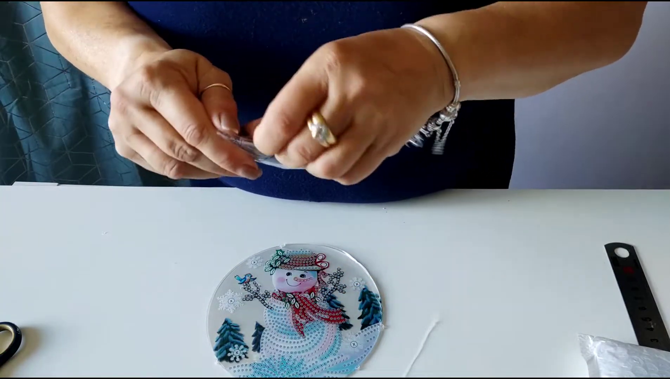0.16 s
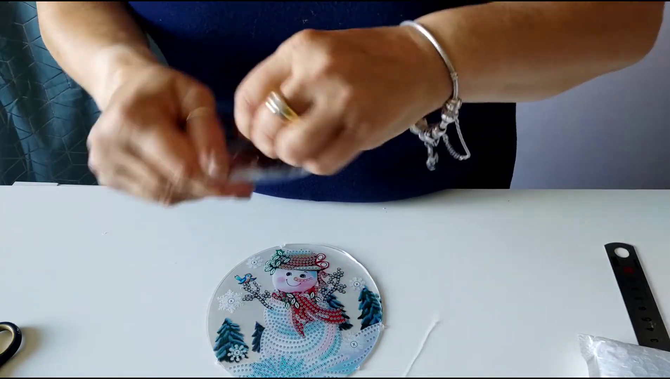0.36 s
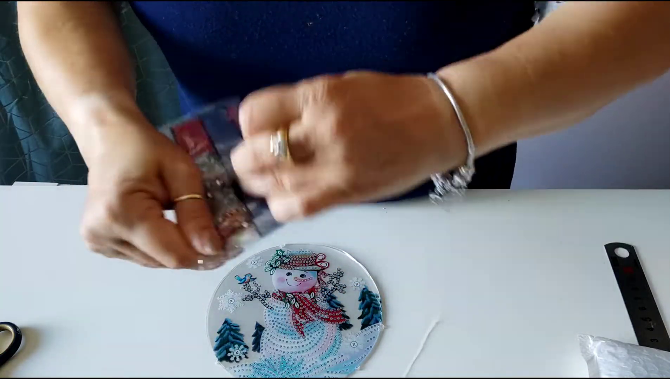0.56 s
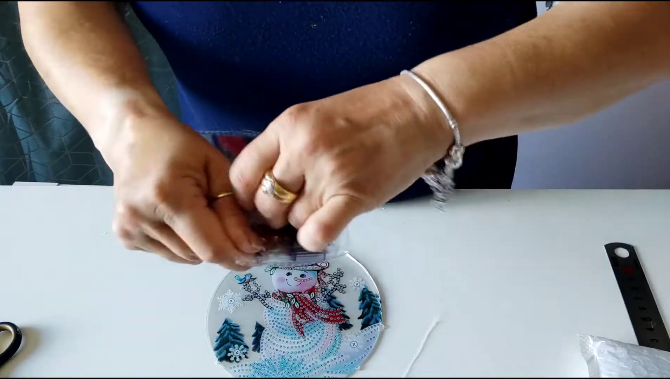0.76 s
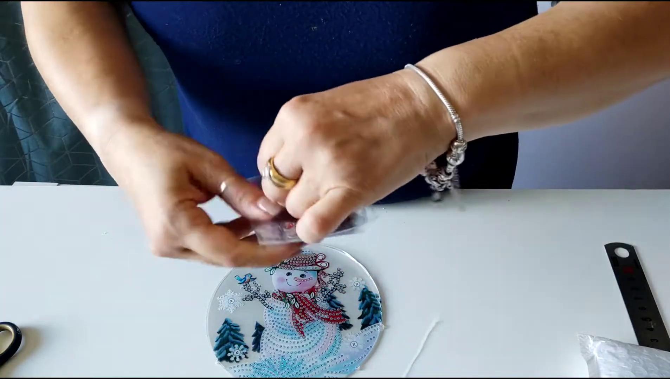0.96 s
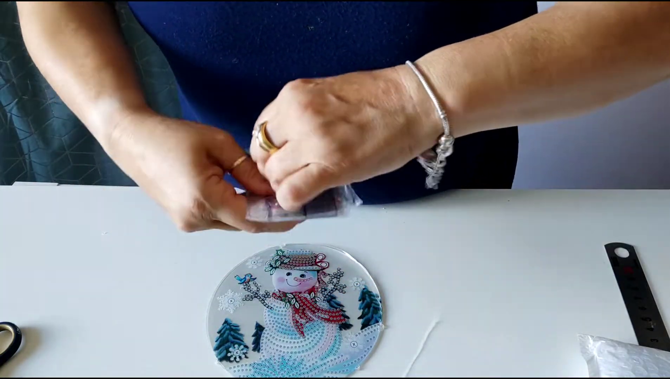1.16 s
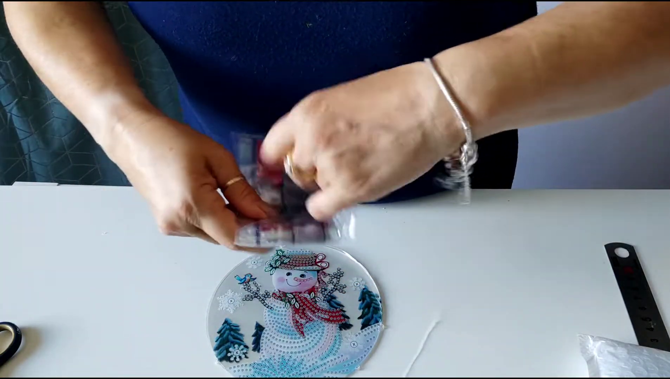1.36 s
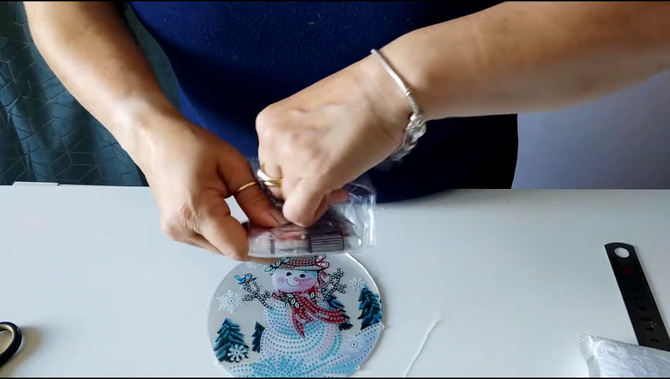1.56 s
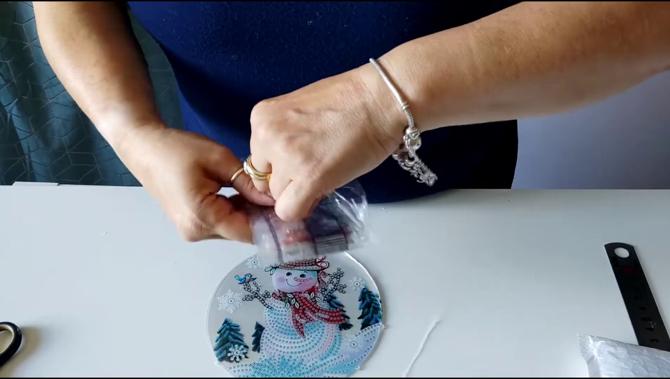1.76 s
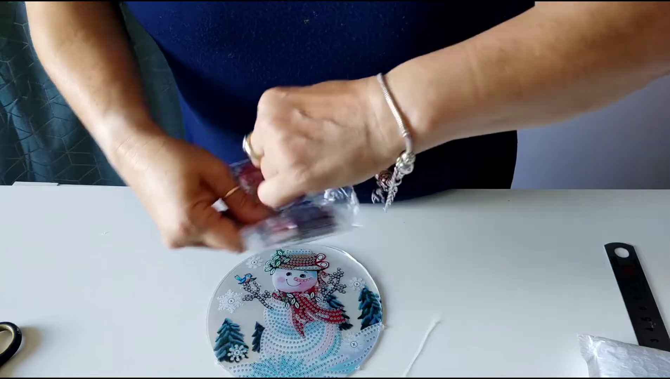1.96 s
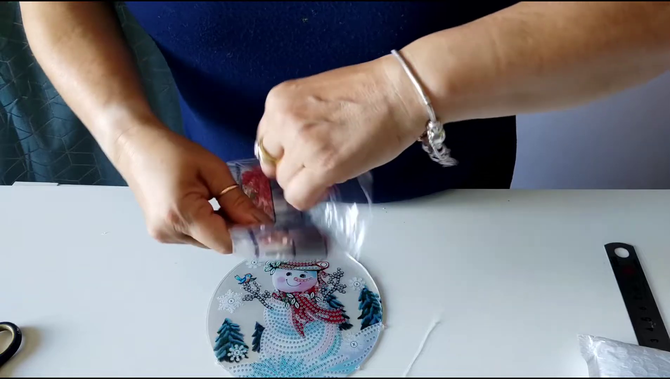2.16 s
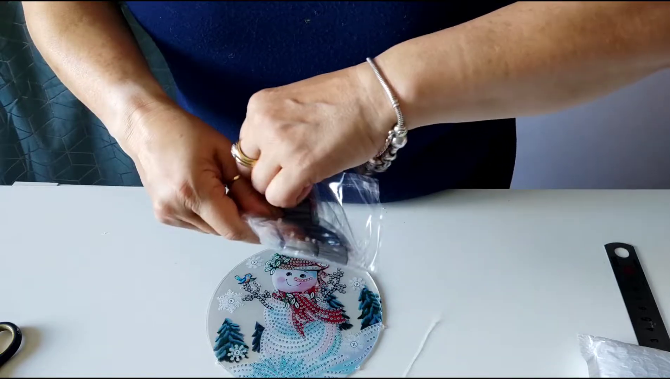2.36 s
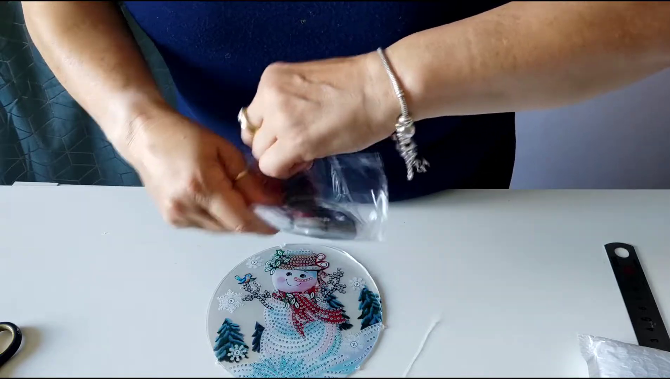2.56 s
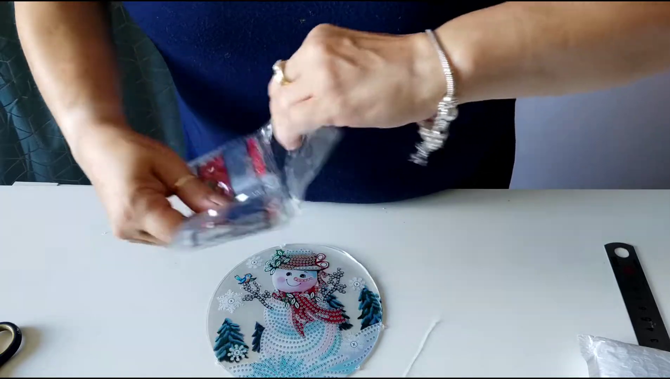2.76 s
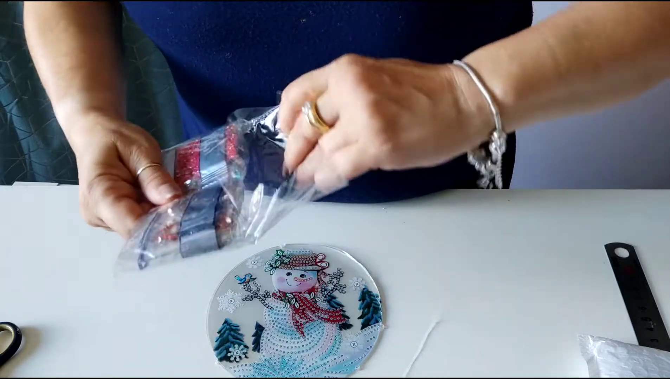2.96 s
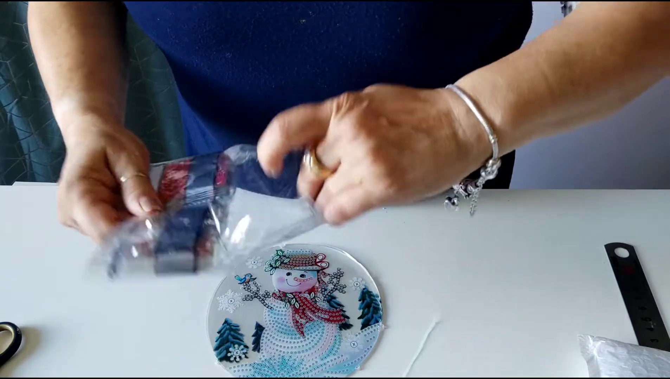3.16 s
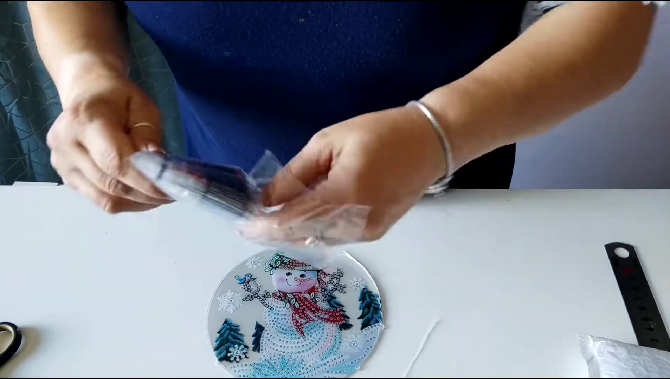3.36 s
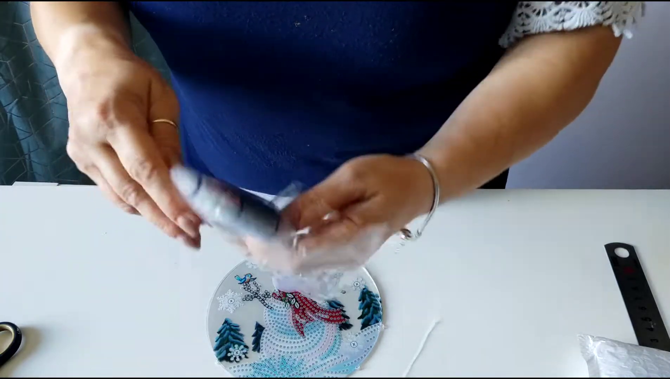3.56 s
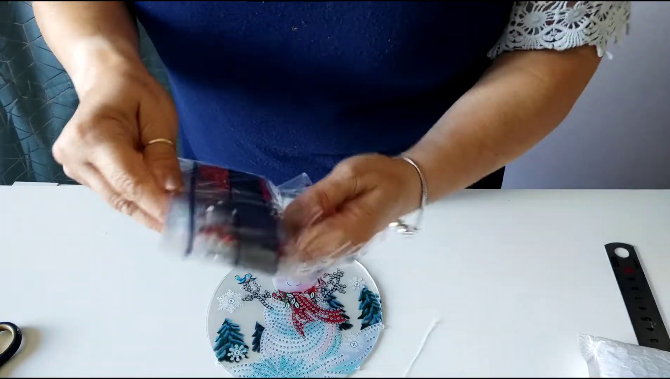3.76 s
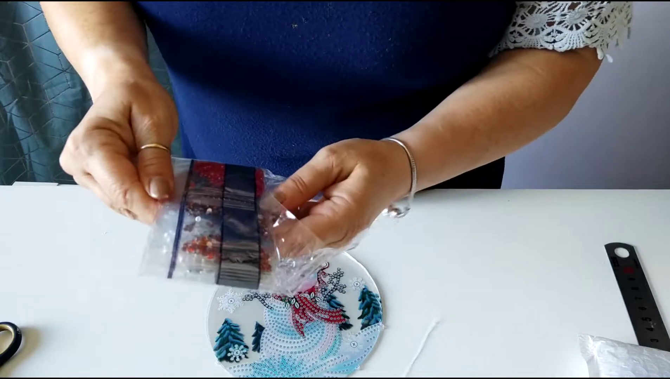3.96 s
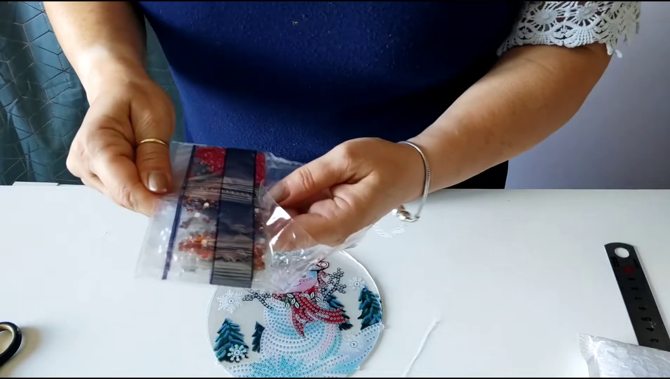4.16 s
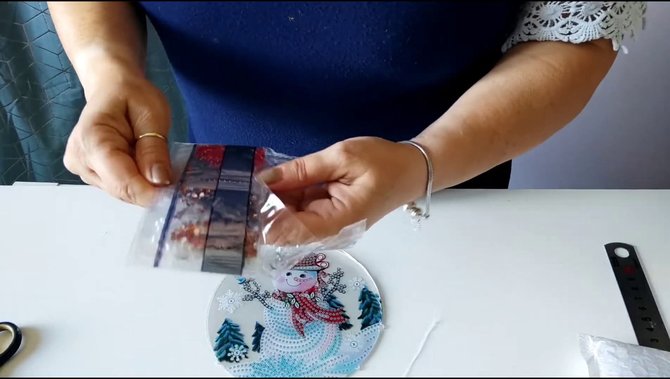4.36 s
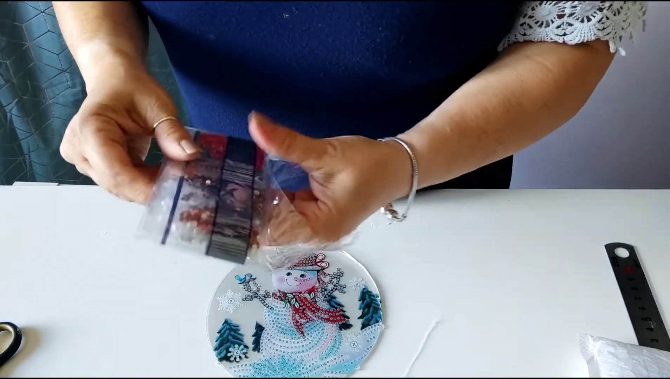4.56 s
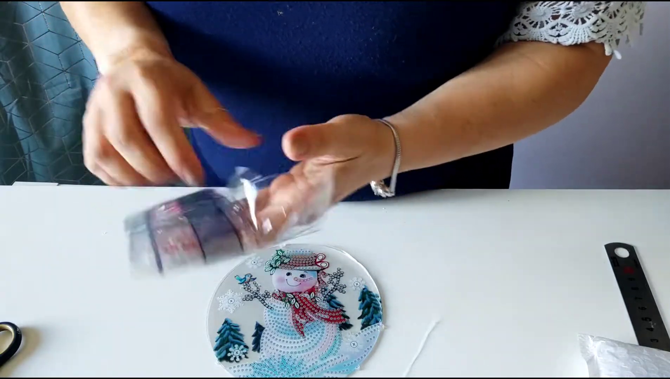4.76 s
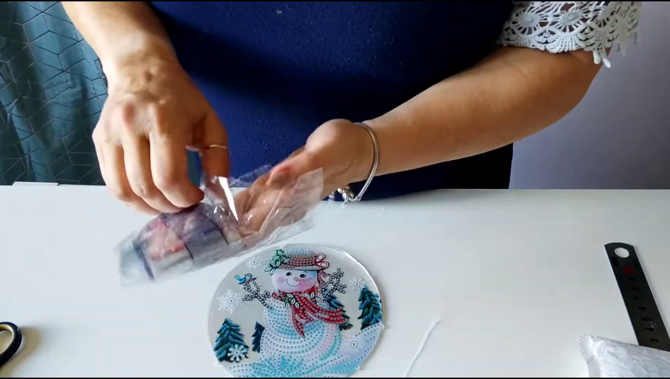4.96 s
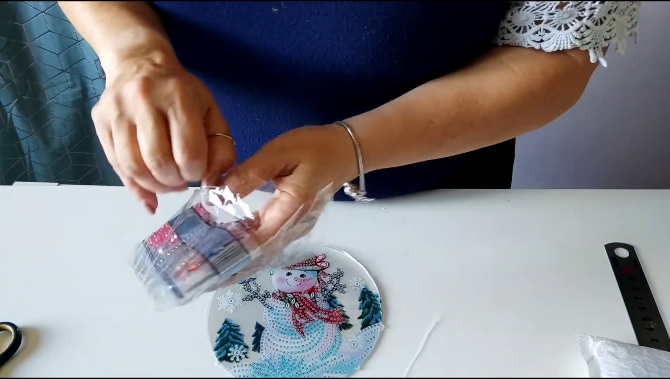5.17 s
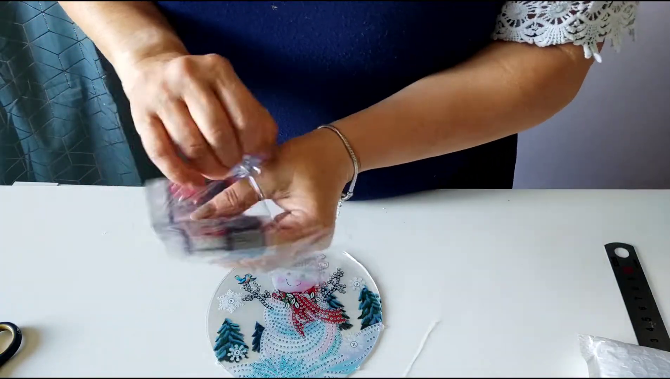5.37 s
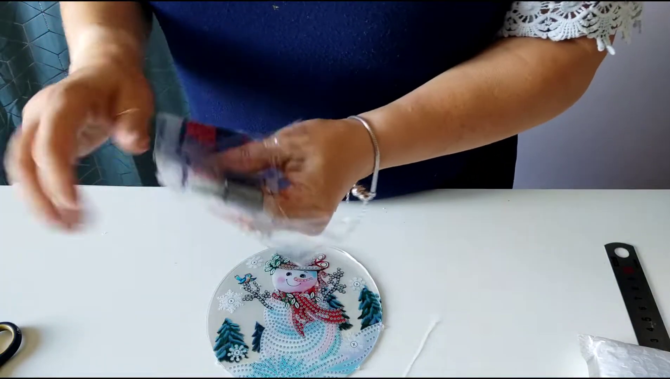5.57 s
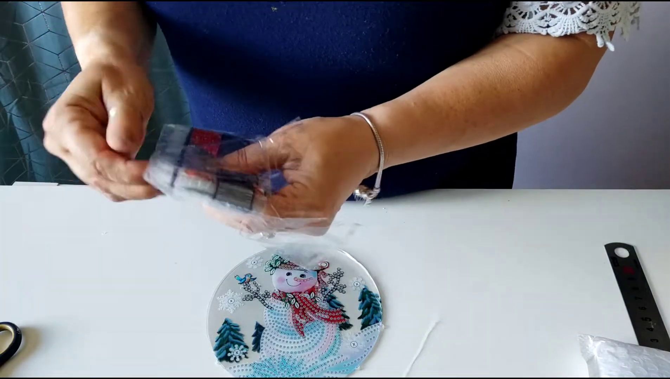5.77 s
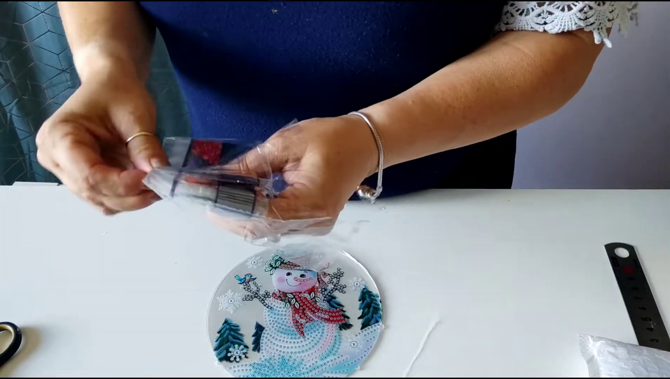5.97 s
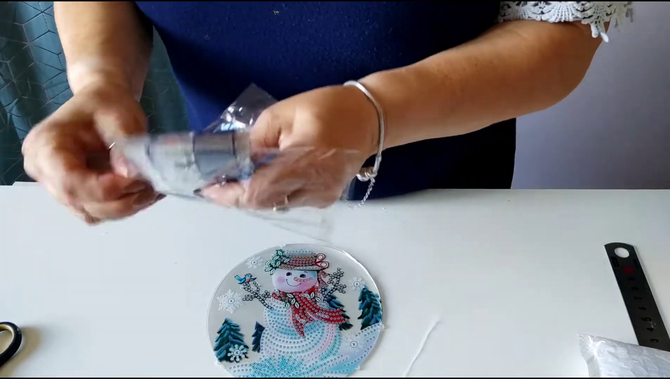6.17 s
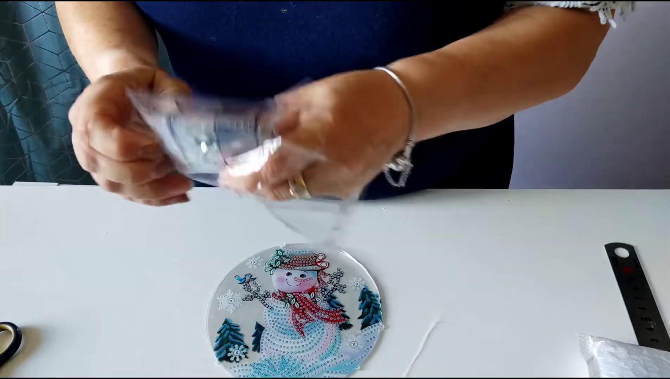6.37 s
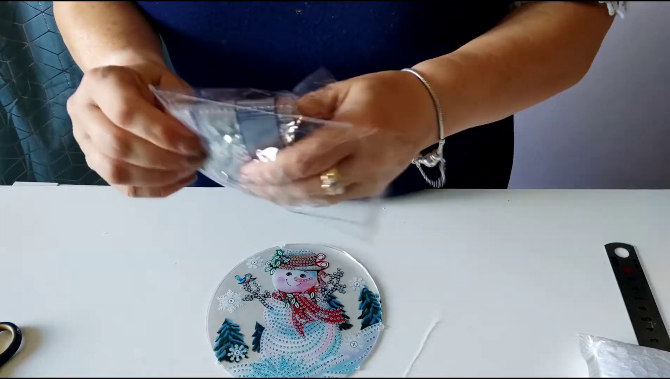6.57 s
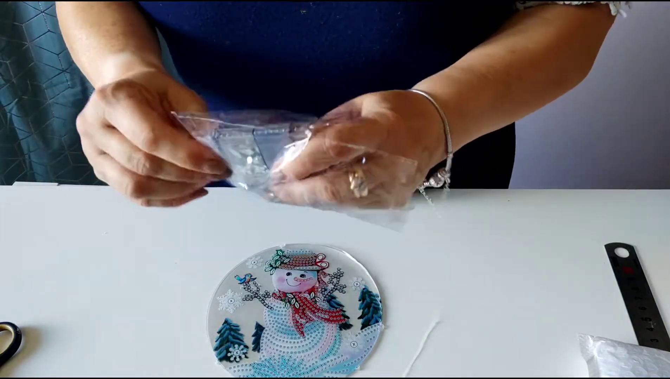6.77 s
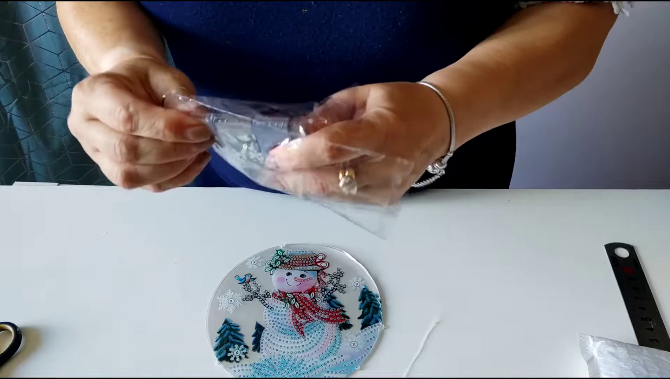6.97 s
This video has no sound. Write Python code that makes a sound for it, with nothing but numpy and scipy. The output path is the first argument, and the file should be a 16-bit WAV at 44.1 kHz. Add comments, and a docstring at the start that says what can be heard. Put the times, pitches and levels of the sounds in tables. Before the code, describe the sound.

A thin plastic bag crinkles in someone's hands, with sharp snaps and duller pops, close up in a quiet room.

```python
"""Two hands work a thin, stiff plastic bag over a table, close to a small stereo microphone in a quiet room.
From the start, creases buckle in sharp snaps over a dense crackle; larger panels and the air in the bag
add duller pops. The bag flops at 0.7 s and four more times near 3 s, around the loudest snap (2.65 s).
The crackle thins towards 5 s, then picks up until the end at 7 s. Throughout, table and room throw
the snaps back and each microphone port rings in the treble."""
import sys
import numpy as np
from scipy import signal
from scipy.fft import rfft, irfft
from scipy.io import wavfile
from scipy.ndimage import uniform_filter1d

SR = 44100
rng = np.random.default_rng(int(sys.argv[2]) if len(sys.argv) > 2 else 0)


def store_pcm(level_fs):
    """Save levels as 16-bit WAV."""
    pcm = np.round(np.clip(level_fs, -1, 1) * 32767).astype(np.int16)
    wavfile.write(sys.argv[1], SR, np.atleast_2d(pcm).T)


N = 309582

# hand squeezes: peak t/s, rise/s, fall/s, fine crackle level/dB, large panel level/dB (both relative)
SQUEEZES = [(0.0, .05, 0.18, -39, -81), (0.153, 0.051, 0.12, -38, -54.5), (.29, 0.083, 0.09, -44, -63),
            (.41, 0.13, 0.13, -40.5, -71), (.54, 0.13, 0.11, -28.5, -49), (0.691, 0.15, 0.2, -35, -57),
            (1.027, 0.22, 0.12, -38, -54.5), (1.147, 0.046, 0.044, -37, -57),
            (1.3, 0.094, 0.19, -28.5, -44), (1.587, 0.14, 0.15, -45.5, -58),
            (1.666, 0.094, 0.2, -37, -51.5), (1.89, 0.095, 0.084, -35.5, -56),
            (2.025, 0.068, 0.22, -32.5, -48), (2.251, 0.25, 0.088, -40, -52),
            (2.414, 0.39, 0.14, -44, -60.5), (2.554, 0.027, 0.079, -39, -55.5),
            (2.667, 0.011, 0.15, -30.5, -52.5), (2.95, 0.54, 0.32, -39.5, -59.5),
            (3.17, 0.03, 0.091, -36, -53), (3.442, 0.16, 0.28, -37.5, -60.5),
            (3.873, 0.093, 0.067, -42.5, -60), (4.04, 0.23, 0.24, -46.5, -64.5),
            (4.21, 0.22, 0.11, -48.5, -69), (4.373, 0.022, 0.16, -45, -82),
            (4.579, 0.091, 0.19, -38, -60.5), (4.685, 0.023, 0.054, -41, -58),
            (4.88, 0.51, 0.18, -60.5, -72), (5.051, 0.46, 0.062, -52.5, -69),
            (5.236, 0.11, 0.094, -35.5, -49), (5.38, 0.34, 0.076, -46, -58.5),
            (5.499, 0.12, 0.091, -35, -51), (5.77, 0.24, 0.038, -51.5, -66),
            (5.867, 0.073, 0.076, -43, -68), (5.973, 0.031, 0.089, -38, -60),
            (6.151, 0.045, 0.066, -30, -45.5), (6.355, 0.094, 0.18, -33.5, -52.5),
            (6.48, 0.28, 0.39, -37, -53.5), (6.6, 0.23, 0.29, -43.5, -57),
            (6.798, 0.18, 0.29, -34.5, -52.5), (6.97, 0.14, 0.27, -41.5, -55.5)]


def snaps(colour_taps):
    """A crease creeps, then lets go in a few slips; its panel follows, last the air in the bag pops."""
    # buckling creases: peak t/s, energy after colouring of tick/dB, air pop/dB, panel/dB
    buckles = [(0.005, 0.5, -43, -12), (0.0318, 6.5, -24, -8), (0.039, -13, -40, -33),
               (0.052, -4, -51, -11.5), (0.1095, -16, -45, -20), (0.121, -7, -25.5, -27),
               (0.1406, -2, -46, -5), (0.1542, -5, -48, -8), (0.1667, -8, -40, -18),
               (0.2038, -10, -22.5, -20), (0.2844, 0, -43, -5), (0.3637, -0.5, -49, -13),
               (0.383, -2, -49, -14), (0.3906, -5, -44, -7.5), (0.399, -9, -46, -28),
               (0.4326, -7, -43, -11.5), (0.4403, 5.5, -27, -5), (0.497, -4, -33, -27),
               (0.5197, -3, -11, 2.5), (0.5414, 10, -28, 5), (0.5637, -4, -18.5, -12),
               (0.5878, -1, -28, -23), (0.6215, 1.5, -8, -30), (0.6437, -4.5, -39, -30),
               (0.682, -5, -14.5, -5), (0.691, 6.5, -17.5, -6), (0.7002, -2, -22, -17),
               (0.7535, -23, -46, -34), (0.8626, -6, -26, -13), (0.8727, -8, -38, -25),
               (0.9057, -15, -47, -25), (0.9416, -4.5, -21, -38), (1.0244, 0, -34, -2),
               (1.1043, -4.5, -25, -9), (1.1114, -4, -43, -7), (1.139, -1, -12.5, -17),
               (1.1563, -7, -18, -26), (1.217, -14, -49, -39), (1.2466, -1.5, -25, -20),
               (1.2784, 1, -34, 0), (1.29, 6, -13, -3), (1.3017, -8, -8, -9), (1.3336, 0, -9, -2),
               (1.34, -8, -29, -14), (1.392, -10, -19, -23), (1.4363, -1, -11.5, -10.5),
               (1.4836, -11.5, -23.5, -23), (1.57, 0.5, -37, -14), (1.5816, 2, -24, -11.5),
               (1.682, -6, -29, -25), (1.7299, -7, -18, -16), (1.756, -8, -32, -15.5),
               (1.8026, -6, -20, -11), (1.82, 0, -39, -2), (1.8521, 6, -30, -16), (1.8594, -3, -33, -16),
               (2.032, -14, -37, -6.5), (2.065, -2.5, -43, -13), (2.1353, -4, -35, -12),
               (2.1583, -7.0, -15.5, -17), (2.167, -0.5, -13.5, -4), (2.198, -10, -15, -21),
               (2.2138, -7, -13.5, -28), (2.2832, -6, -21, -10.5), (2.3319, -9, -27, -18),
               (2.399, -1.5, -42, -7.5), (2.4324, -4, -37, -30), (2.46, -9.5, -36, -20),
               (2.4694, -11, -27, -18), (2.533, 0.5, -13, -12), (2.5529, -16, -12.5, -12),
               (2.6256, -3, -42, -7.5), (2.6334, -8, -46, -19), (2.645, 2.5, -33, -15),
               (2.6497, 14.5, 1.5, 8), (2.6825, -2, -1.5, -6), (2.7306, -3.5, -18, -20),
               (2.7354, 4.5, -14.5, 0.5), (2.7672, -9, -12, -21), (2.7853, -4, -36, -20),
               (2.816, 4.5, -11, -0.5), (2.8313, 2, -12, -5.5), (2.8779, -1, -19, -6),
               (2.8878, -4, -23, -17), (2.9132, -1, -25, -17), (2.967, -0.5, -24, -12),
               (2.995, -4.5, -35, -28), (3.003, -1, -9.5, -6), (3.0337, -12, -37, -26),
               (3.0518, 1, -13.5, -27), (3.0832, -8, -43, -28), (3.099, -8, -44, -30), (3.121, 0, -16, -1),
               (3.144, -8, -21, -26), (3.1571, 7, -7, 1.5), (3.171, -1, -35, -21),
               (3.3198, -5.5, -20.5, -10), (3.3778, -12, -37, -35), (3.389, 0, -40, -11.5),
               (3.3946, -7, -36, -30), (3.4252, -17, -26, -14), (3.463, -9, -22, -11), (3.47, -3, -25, -15),
               (3.5418, -9, -41, -10), (3.58, -1, -38, -15), (3.595, -4, -46, -16), (3.671, -3, -21, -11),
               (3.7213, -4.5, -34, -19), (3.7401, -7.5, -52, -21), (3.7824, -12, -56, -38),
               (3.8432, -9, -38, -32), (3.874, -5, -24.5, -14), (3.8823, -9.5, -27, -30),
               (3.9063, -11.5, -32, -34), (3.957, -7, -30, -12), (3.972, 0, -43, -12),
               (3.999, -8.5, -42, -16), (4.012, -9, -45, -29), (4.036, -8, -48, -28),
               (4.0607, -2.5, -23, -10), (4.1391, -1, -24, -11), (4.1826, -9.5, -30, -17),
               (4.332, -20.5, -44, -33), (4.3533, -8, -56, -26), (4.361, -11.5, -36, -19),
               (4.3906, -16.0, -26.5, -26), (4.4124, -8, -29, -20), (4.476, -16.5, -36, -37),
               (4.5094, -1, -24, -11.5), (4.5612, -9, -32, -32), (4.6138, -5, -26, -19),
               (4.6236, -3, -22, -19), (4.6433, -13, -32, -28), (4.677, -2.5, -38, -34),
               (4.689, -5, -34, -35), (4.7446, -10, -28, -36), (4.8224, -17.5, -28, -19.5),
               (4.929, -15, -38, -20), (4.951, -14, -44, -21), (5.0016, -15.5, -30, -29),
               (5.0124, -28, -31, -18.5), (5.058, -9, -28, -37), (5.0791, -14, -28, -17),
               (5.137, -7, -41, -34), (5.1472, -1, -30, -11.5), (5.1992, -0.5, -30, -33),
               (5.217, -9, -33, -13), (5.2283, -7, -9.5, -9), (5.241, 3.5, -19, -18), (5.254, -5, -40, -16),
               (5.313, -4, -42, -26), (5.352, -1, -18.5, -7.5), (5.3962, -3.5, -31, -5),
               (5.406, -5, -37, -28), (5.426, -7, -40, -28), (5.4364, -5.5, -41, -34),
               (5.4467, -19, -23, -7.5), (5.4856, -1, -9.5, -29), (5.4998, -0.5, -29, -32),
               (5.6042, -7.5, -29, -11.5), (5.754, -6, -27.5, -11.5), (5.8111, -5, -43, -17),
               (5.856, -5.5, -33, -14), (5.8652, -20, -26, -13.5), (5.936, -24, -31, -21),
               (5.9527, -17, -21.5, -12), (5.9685, 0, -30, -7), (6.0857, -5.5, -38, -23),
               (6.1474, -27, -17, -20), (6.172, 1, -30, -31), (6.25, -8.5, -31, -14.5),
               (6.2778, -5, -24, -11), (6.2947, -26, -41, -9), (6.336, -5, -28, -27), (6.341, -5, -32, -25),
               (6.3465, -4, -27, -24), (6.353, -9, -30, -31), (6.367, -2, -35, -31), (6.4252, 3.5, -16, -5),
               (6.4814, -21, -24, -23), (6.5036, -1.5, -19, -20), (6.578, 5.5, -16.5, -2.5),
               (6.621, -1, -26, -26), (6.6524, -5, -24, -8.5), (6.7556, -22, -18.5, -26),
               (6.7881, 2, -19, -5.5), (6.7995, -3.5, -40, -16), (6.8113, -11, -27, -31),
               (6.855, -8, -37, -24), (6.9, -5, -24, -9), (6.9624, -0.5, -40, -31), (6.981, 0.5, -20, -20),
               (7.003, -3, -30, -10.5)]
    out, lead = np.zeros((2, N + 2000)), 150
    t_ms = (np.arange(450) - lead) * 1000 / SR
    panel = np.where(t_ms < 0, 0.52 * np.exp(t_ms / 0.88), 0.53 * np.exp(-t_ms / 1.64))
    pop = np.exp(-abs(t_ms - 2.4) / 1.58)
    bright = band_click(3270, 18300)
    for t_s, *energy_db in buckles:
        slips = rng.standard_normal(450) * (rng.random(450) < .25)
        slips[lead] = 1.9  # main slip
        slip_ms = .8 * gain_of(.4 * energy_db[0])  # big creases slip for longer
        tick = np.where(t_ms < 0, .45 * np.exp(t_ms / slip_ms), np.exp(-t_ms / slip_ms))
        size = 1.245 ** rng.uniform(-0.81, 1)  # larger panels sound lower
        path = bounces(2, bounce_db=-2.0, decay_ms=1.74)
        path *= pan(2.0 * rng.standard_normal())
        start = round(t_s * SR) - lead - 8
        clicks = bright, band_click(300 / size, 1050 / size), band_click(1000 / size, 4800 / size)
        for envelope, click, db in zip((tick, pop, panel), clicks, energy_db):
            part = signal.fftconvolve(path, np.convolve(slips * envelope, click)[None], axes=1)
            norm = np.linalg.norm(signal.fftconvolve(part, colour_taps[:, :512], axes=1)) / np.sqrt(2)
            out[:, start:start + part.shape[1]] += gain_of(db) * part / norm
    return out[:, :N]


def crackle():
    """Small creases tick; larger panels ring low for a cycle or so, the widest more as the bag opens."""
    # openness of the bag: t/s, boost of the widest panels/dB
    openness = [(0, -30), (.55, -12), (.68, 3), (1.2, -9.5), (2.3, -1), (2.75, 9), (3.3, 6), (4.1, 2.5),
                (5.3, -1.5), (7, -2)]
    open_db = np.interp(np.arange(N) / SR, *np.transpose(openness))
    fine_peaks_db, panel_peaks_db = np.transpose(SQUEEZES)[-2:]
    fine_db = squeeze_db(fine_peaks_db, swell_db=19, rest_db=-87)
    panel_db = squeeze_db(panel_peaks_db, swell_db=18, rest_db=-78)
    ticks = [np.array([1., tail]) for tail in np.linspace(-.85, .1, 8)]
    panels = [ring(hz, cycles=1.0) for hz in np.geomspace(1100, 3600, 7)]
    wide_panels = [ring(hz, cycles=1.3) for hz in np.geomspace(210, 950, 7)]
    fine = grains(fine_db + 6.5, ticks, per_s=950, size_db=1.0, clump_db=1.0)
    large = grains(panel_db + 14.5, panels, per_s=600, size_db=2.0, clump_db=2.5)
    wide = grains(panel_db + open_db + 14.0, wide_panels, per_s=400, size_db=1.5, clump_db=2.0)
    return fine + large + wide


def squeeze_db(peaks_db, swell_db, rest_db):
    """Each squeeze swells and dies by swell_db over its rise and fall; the film creeps at rest_db."""
    t = np.arange(0, N / SR + .002, .002)
    peak_s, rise_s, fall_s = np.transpose(SQUEEZES)[:3, :, None]
    away = np.where(t < peak_s, (peak_s - t) / rise_s, (t - peak_s) / fall_s)
    power = (gain_of(peaks_db[:, None] - swell_db * away ** 1.187) ** 2).sum(0) + gain_of(rest_db) ** 2
    return np.interp(np.arange(N) / SR, t, 10 * np.log10(power))


def grains(level_db, shapes, per_s, size_db, clump_db):
    """Sparse clicks, a few large, in clumps; every shape has its own place on the bag."""
    clumps = unit_rms(uniform_filter1d(rng.standard_normal(N), 250))
    density = np.exp(.55 * clumps)
    out = np.zeros((2, N))
    for shape in shapes:
        fold_db = 2.64 * unit_rms(uniform_filter1d(rng.standard_normal(N), 6000))  # places come and go
        size = gain_of(size_db * np.minimum(rng.exponential(1, N), 4) + clump_db * clumps + fold_db)
        train = size * rng.choice([-1., 1.], N) * (rng.random(N) < density * per_s / len(shapes) / SR)
        path = bounces(rng.integers(0, 6), bounce_db=-1.0, decay_ms=5.6)
        click = signal.fftconvolve(path, shape[None] / np.linalg.norm(shape), axes=1)
        out += signal.oaconvolve(train[None], click, axes=1)[:, :N]
    local_rms = np.sqrt(uniform_filter1d((out ** 2).mean(0), 2500) + 1e-20)
    return gain_of(level_db) * out / local_rms


def thuds():
    """The whole bag flops: a soft low push of air, a little to the left."""
    # flops: t/s, level/dB
    flops = [(0.668, -50), (2.642, -51), (2.831, -48), (3.166, -46), (3.189, -45)]
    out, push = np.zeros(N), ring(hz=113, cycles=0.67)
    for t_s, db in flops:
        out[round(t_s * SR):][:len(push)] += gain_of(db) * push
    return out * pan(4.0)


def ring(hz, cycles):
    """A struck patch of film; falls to 1/e in the given cycles."""
    t = np.arange(int(5 * cycles / hz * SR) + 2) / SR
    return np.sin(2 * np.pi * hz * t) * np.exp(-t * hz / cycles)


def band_click(lo_hz, hi_hz):
    """One broad band, energy 1."""
    click = signal.butter(2, [lo_hz, hi_hz], "band", fs=SR, output="sos")
    click = signal.sosfilt(click, signal.unit_impulse(600))
    return click / np.linalg.norm(click)


def colour():
    """Stereo taps for what the film radiates and the ringing ports make of it."""
    # radiation of the film: f/Hz, relative level/dB
    film = [(60, -33.5), (150, -19), (400, -9), (900, -4), (2700, 2), (3500, -1.5), (6000, -1.5),
            (8800, -1), (10200, -11.5), (13000, -7), (15500, -11)]
    # big panels lie to the left: f/Hz, left minus right/dB
    balance = [(100, 5), (300, 4), (1300, 0), (2400, -1), (6000, -2.5)]
    hz = np.fft.rfftfreq(4096, 1 / SR)
    left_db, right_db = port_db(hz) + curve(film, hz) + np.array([[.5], [-.5]]) * curve(balance, hz)
    taps = np.array([minimum_phase(left_db), minimum_phase(right_db)])
    return taps / np.sqrt((taps ** 2).sum(1).mean())


def port_db(hz):
    """Each port is a small cavity: flat below, a peak at its pitch, falling above."""
    # left and right cavity: f/Hz, width/Hz, gain/dB
    cavities = [(8000, 1390, 1), (7334, 800, -0.5)]
    return np.array([db - 20 * np.log10(abs(1 - (hz / f) ** 2 + 1j * hz * width / f ** 2))
                     for f, width, db in cavities])


def bounces(lag_samples, bounce_db, decay_ms):
    """Direct sound and quick bounces off table and hands, a few samples apart at the two ports."""
    delays = np.r_[0, rng.integers(10, 250, 10)]
    gains = gain_of(bounce_db) * rng.standard_normal(11) * np.exp(-delays * 1000 / SR / decay_ms)
    gains[0] = 1
    taps = np.zeros((2, 270))
    taps[0, delays + np.r_[lag_samples, rng.integers(0, 7, 10)]] = gains
    taps[1, delays + np.r_[0, rng.integers(0, 4, 10)]] = gains
    return taps / np.linalg.norm(taps)


def room(x):
    """Sparse reflections of random sign, each band dying at its own speed."""
    # room decay: f/Hz, T60/s
    decay = [(200, 0.16), (1000, 0.093), (4000, 0.16), (10000, 0.019)]
    taps = np.zeros((2, SR // 2))
    delays = np.arange(260, SR // 2 - 20, 20) + rng.integers(0, 20, (2, (SR // 2 - 261) // 20))
    np.put_along_axis(taps, delays, rng.choice([-1., 1.], delays.shape), 1)
    hz, t, spectra = signal.stft(taps, SR, nperseg=256)
    tail = signal.istft(spectra * gain_of(-60 * t / curve(decay, hz)[:, None]), SR, nperseg=256)[1]
    return signal.fftconvolve(x, tail / np.linalg.norm(tail[0]), axes=1)[:, :N]


def hush(rms_db=-62):
    """Faint wavering noise with a low rumble, unrelated left and right."""
    # quiet of the room: f/Hz, relative density/dB
    floor = [(12, 4), (20, -0.5), (41, -6.5), (77, -10), (624, -13.5), (900, -65), (7520, -12),
             (16000, -68)]
    spectrum = gain_of(curve(floor, np.fft.rfftfreq(N, 1 / SR)))
    waver_db = 3.4 * unit_rms(uniform_filter1d(uniform_filter1d(rng.standard_normal((2, N)), 3000), 3000))
    noise = irfft(rfft(rng.standard_normal((2, N))) * spectrum, N)
    return gain_of(rms_db) * unit_rms(noise * gain_of(waver_db) * pan(3.0))


def gain_of(db):
    return 10 ** (np.asarray(db) / 20)


def pan(left_minus_right_db):
    return gain_of(left_minus_right_db * np.array([[.5], [-.5]]))


def unit_rms(x):
    return x / np.sqrt(np.mean(x ** 2) + 1e-20)


def curve(points, hz):
    """Table interpolated on a log-frequency axis."""
    f, value = np.transpose(points)
    return np.interp(np.log(hz + 1), np.log(f + 1), value)


def minimum_phase(db):
    """Taps for a gain given from 0 Hz to SR / 2."""
    log_gain = np.log(gain_of(np.r_[db, db[-2:0:-1]]))
    return np.fft.ifft(np.exp(signal.hilbert(log_gain).conj())).real[:len(db) // 2]


def scene():
    """Bag and room reflections, coloured by film and ports, over thuds and hush."""
    colour_taps = colour()
    bag = crackle() + snaps(colour_taps)
    in_room = bag + gain_of(-14.0) * room(bag)
    return signal.oaconvolve(in_room, colour_taps, axes=1)[:, :N] + thuds() + hush()


def record(dry):
    """Soft peak limiting, then a low-pass."""
    ceiling, edge_hz = .8, 15800
    limited = ceiling * np.tanh(dry / ceiling)
    lowpass = signal.firwin(511, edge_hz, window=("kaiser", 9), fs=SR)
    return signal.oaconvolve(limited, lowpass[None], "same")


dry = scene()
out = record(dry)
store_pcm(out)
```